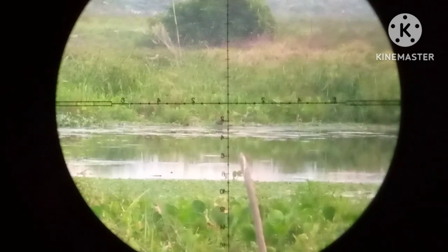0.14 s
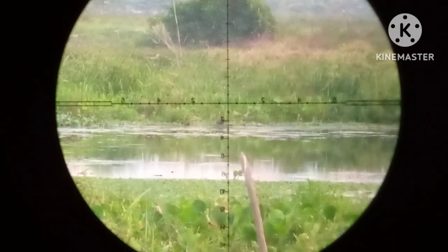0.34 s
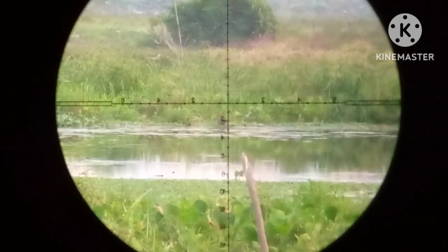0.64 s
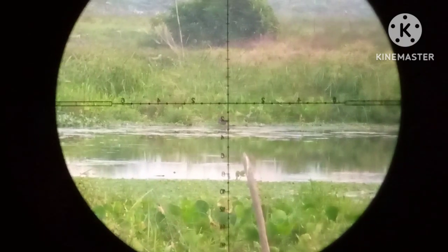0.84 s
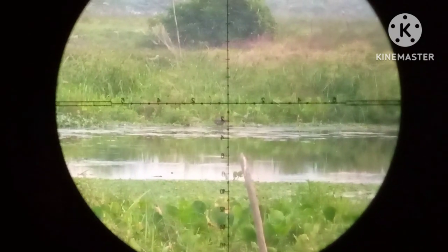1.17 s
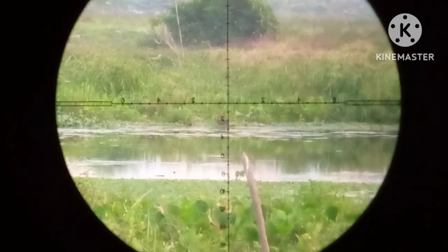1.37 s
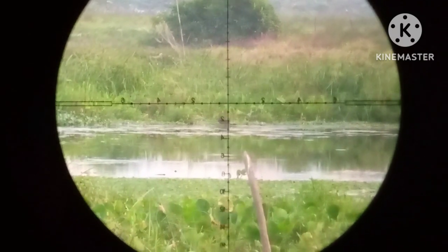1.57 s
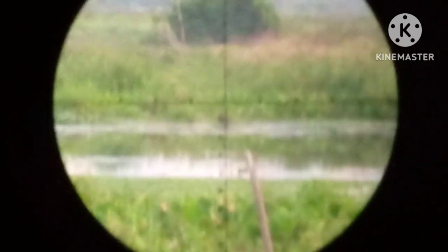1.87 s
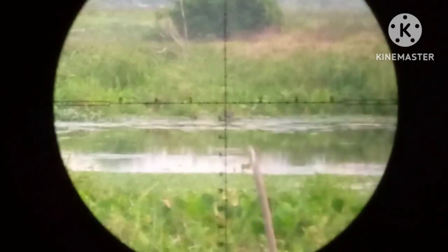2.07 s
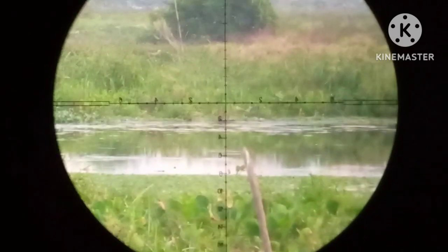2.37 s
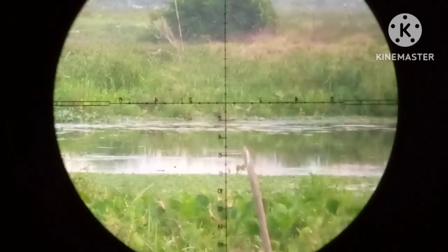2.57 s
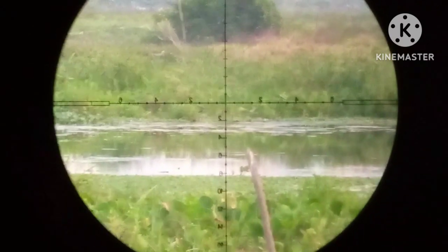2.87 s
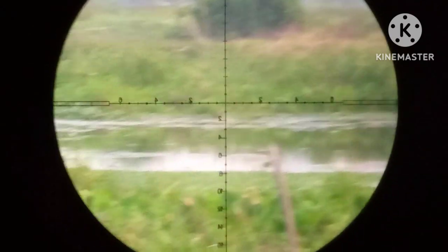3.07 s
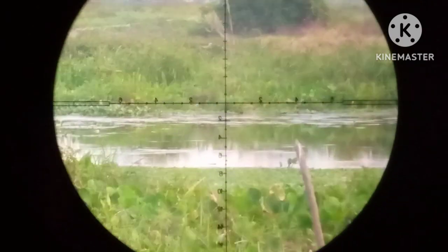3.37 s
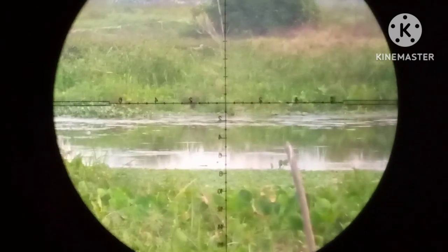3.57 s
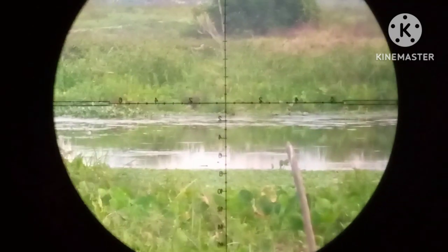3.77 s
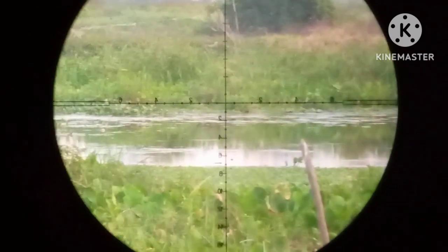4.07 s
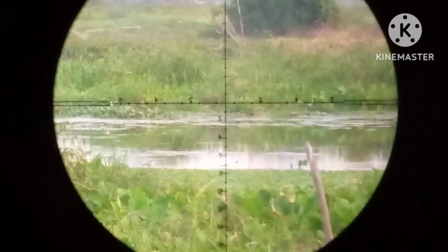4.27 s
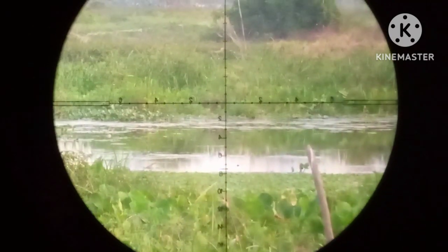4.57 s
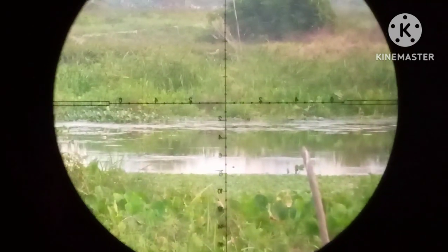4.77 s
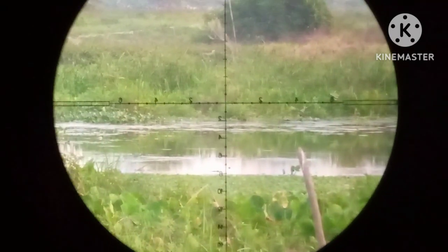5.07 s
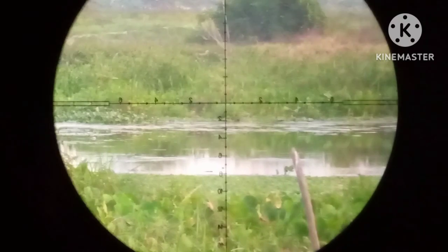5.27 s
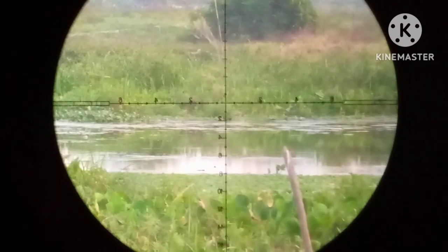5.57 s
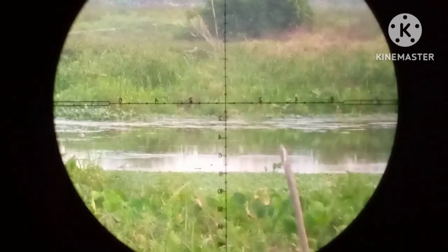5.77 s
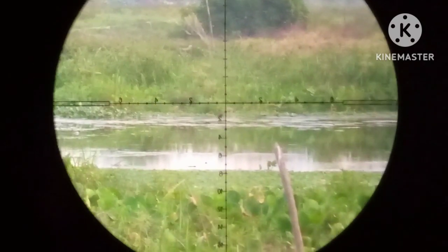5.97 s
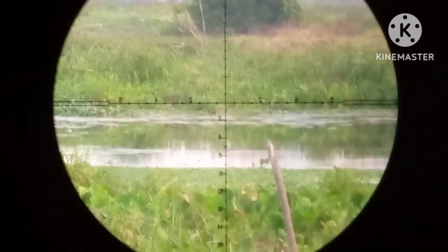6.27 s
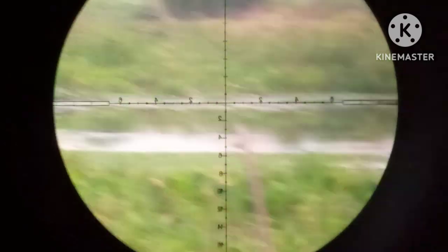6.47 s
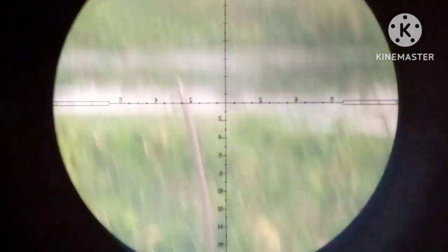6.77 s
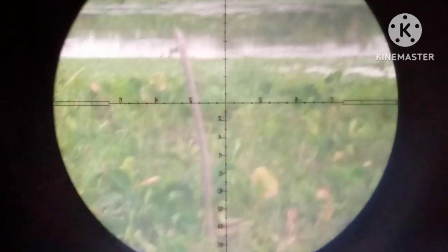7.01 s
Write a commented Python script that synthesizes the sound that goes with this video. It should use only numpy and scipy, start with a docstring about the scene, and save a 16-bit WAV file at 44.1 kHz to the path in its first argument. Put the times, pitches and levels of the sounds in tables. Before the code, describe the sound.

Throughout the seven seconds, a narrow, shrill insect drone around 7.5 kHz hovers over soft open air and faint low breeze, with delicate crickets and far, drooping bird whistles and rasps. A near bird gives very short, rising double chips at about 0.9, 1.2 and 1.6 seconds. At 1.86 an air rifle fires close by: a dense cluster of metal clashes and thuds within 50 milliseconds, a sharp rush of air, a rough brief squawk and a ringing steel tail fading over half a second. A resonant knock comes at 2.08, a bright distant slap with a short echo at 2.5, and a tiny click at 2.8. The calm marsh returns, with faint arched bird notes from 3.1, a lone lower chip at 3.67 and two little round plops at 3.8 and 3.9. From 6.48, dry handling clicks cluster, a loose part bounces quickly near 6.7, and sparse ticks continue to the end.

```python
"""Throughout, filtered-noise insects drone high in pitch over open air; gliding tones form two crickets and far birds.
First a near bird gives three double chips, each a rapid upward pitch sweep. Then an air rifle fires across a marsh:
noise bursts form its slamming action and rush of air, a shaken tone its squawk, decaying modes its ringing steel.
A resonant knock in the gun follows, then a far slap of noise and short modes, and a first small click.
Later come a lone chip and two plops as decaying tones; last, the rifle clicks and a loose part bounces as it is moved."""
import sys
import numpy as np
from scipy import signal
from scipy.fft import rfft, irfft, next_fast_len
from scipy.io import wavfile

SR = 44100
rng = np.random.default_rng(int(sys.argv[2]) if len(sys.argv) > 2 else 0)


def store_pcm(level_fs):
    """Save levels as 16-bit WAV."""
    pcm = np.round(np.clip(level_fs, -1, 1) * 32767).astype(np.int16)
    wavfile.write(sys.argv[1], SR, np.atleast_2d(pcm).T)


N = 314874
T = np.arange(N) / SR
LN_1000 = np.log(1000)  # amplitude decay over one t60, 60 dB

# All noise colours are scaled to unit rms before use, so their levels are relative.
# Insect chorus: [f/Hz, relative level/dB per Hz]
DRONE_COLOUR = [(6000, -32.5), (6250, -20), (6450, -10), (7000, -2.5), (7350, 0), (7600, 3.5), (7850, -2.5),
                (8050, -14), (8500, -25.5), (9000, -19.5), (9500, -26.5), (10800, -29), (11500, -35)]
# Open air: [f/Hz, relative level/dB per Hz]
AIR_FLOOR_COLOUR = [(76, -30.5), (130, 1.5), (415, -5.5), (608, -7.5), (1070, -18.5), (2030, -23.5),
                    (2550, -25.5), (3070, -25.5), (3520, -27.5), (4360, -24.5), (5000, -36.5),
                    (6500, -51.5), (11000, -120)]
# Faint high hiss: [f/Hz, relative level/dB per Hz]
HISS_COLOUR = [(2000, -20), (4000, 6), (10000, 0.5), (11500, -11), (13800, -7.5), (15000, 5), (15600, 0.5),
               (16200, -17.5)]
# Low rumble of breeze, thumps and recoil: [f/Hz, relative level/dB per Hz]
RUMBLE_COLOUR = [(20, -28), (40, -11.5), (65, 0.5), (95, 1), (130, -6.5), (200, -18.5), (400, -40.5)]
# Brief soft low thumps in the rumble: [t/s, level/dB]
RUMBLE_SWELLS = [(.34, -66), (1.1, -66.5), (1.399, -63.5), (3.22, -60.5), (3.6, -65), (4.36, -64.5),
                 (5.11, -64.5), (5.89, -65.5)]
# Scraped wing of a loosely pulsing insect: [f/Hz, relative level/dB per Hz]
CHURR_COLOUR = [(7500, -20), (7800, 0.5), (8200, -2.5), (8500, -17)]
# Far drooping whistles: [t/s, starting f/Hz, level/dB before the common gain]
WHISTLES = [(.01, 4630, -79.5), (.16, 4380, -82), (0.529, 4590, -72.5), (2.13, 4600, -77.5),
            (2.66, 4520, -81), (4.34, 4440, -72.5), (4.87, 4610, -80.5), (5.55, 4470, -78),
            (6.33, 4120, -80), (6.76, 4566, -74.5)]
# Rasp runs of two birds: [first t/s, number of calls, gap/s, gap change per call/s,
# length/s, f/Hz, level/dB before the common gain]
RASP_RUNS = [(.703, 4, .124, 0.0112, 0.044, 3990, -69.5), (4.047, 6, .33, -0.0079, 0.074, 3110, -73.5)]
# Small bird's arched notes: [t/s, length/s, top f/Hz, level/dB before the common gain]
ARCHES = [(3.134, .14, 5920, -73.5), (3.354, .125, 5880, -74.5), (3.655, .085, 5370, -70)]
# Short, nearly level notes of far birds: [t/s, length/s, middle f/Hz, level/dB before the common gain]
LEVEL_NOTES = [(0.314, 0.016, 5010, -68), (.683, .18, 2820, -89), (2.898, 0.13, 3350, -80.5),
               (3.071, 0.18, 3330, -80), (3.234, .028, 4720, -73), (3.386, 0.052, 1954, -78.5),
               (3.776, 0.034, 4480, -75.5), (4.22, .11, 608, -66.5), (4.555, 0.048, 4810, -73),
               (5.479, .14, 1509, -82), (5.895, .055, 2060, -71.5), (5.917, 0.027, 2980, -68),
               (5.94, .03, 5210, -69.5)]
# Near bird's double chips: [t/s, first chip's top f/Hz, first level/dB, second level/dB]
DOUBLE_CHIPS = [(0.9118, 8020, -36, -27.5), (1.2062, 7785, -29.5, -26.5), (1.6262, 7860, -34, -28)]
# One lower, lone chip: [t/s, length/s, f approached/Hz, level/dB, start drop/share of f, sweep time/share of length]
LONE_CHIP = (3.6653, .0033, 5150, -44, .64, .5)
# Small plops on the water: [t/s, relative level/dB, f/Hz]
PLOPS = [(3.798, -57, 1870), (3.895, -56.5, 1340)]
# Clicks of handling: [t/s, relative level/dB, ring f/Hz, ring t60/s]
CLICKS = [(2.8114, -56.5, 5790, .015), (6.479, -46, 2554, .016), (6.5139, -42, 1360, .017),
          (6.548, -51.5, 2410, .02), (6.629, -66, 3550, .03), (6.641, -57, 6070, .015),
          (6.6492, -46, 3240, 0.023), (6.655, -52, 4570, 0.014), (6.8676, -57, 4330, .012),
          (6.9384, -51.5, 6120, 0.019), (7.0738, -61, 2490, 0.023)]
# Broad tick of a click: [f/Hz, relative level/dB per Hz]
CLICK_COLOUR = [(600, -25), (1400, 6), (1900, -2), (2500, -9.5), (3400, -1), (4600, -13), (5300, -11),
                (6200, 6.5), (7000, -21), (8000, -48), (14000, -24)]
# Resonances that every click wakes: [f/Hz]
HOUSING_MODES = [1430, 2460, 3430, 4640, 6140]
# The pellet's far slap: [t/s, relative level/dB, t60/s]
SLAP_BLOWS = [(2.4975, -41, 0.029), (2.5003, -27, 0.021), (2.5045, -40, 0.011), (2.508, -49, 0.085)]
# Broad sound of the slap: [f/Hz, relative level/dB per Hz]
SLAP_COLOUR = [(300, -48), (900, -44), (1300, -0.5), (2000, -6), (2600, 3), (3300, 1), (4200, 2),
               (5200, -6), (6200, 0.5), (6900, -27), (7500, -10), (8400, -27), (12000, -33), (15000, -28)]
# Ringing of what the pellet strikes: [f/Hz, level/dB, t60/s]
TARGET_MODES = [(1630, -54, 0.092), (1920, -48.5, 0.097), (2470, -39.5, 0.043), (2550, -57, 0.25),
                (3670, -47, 0.071), (4030, -39, 0.058), (4480, -43.5, 0.086), (6200, -62, 0.17),
                (7450, -42, 0.057)]
# Rattle and knock in the gun: [t/s, level/dB, t60/s]; a zero t60 is silent
KNOCK_BLOWS = [(2.066, -52.5, 0.02), (2.0765, -56, 0), (2.0798, -45, 0.16)]
# Body resonances of the gun: [f/Hz, bandwidth/Hz, relative level/dB]
STOCK_MODES = [(858, 48, -1.5), (977, 60, 2.5), (1170, 53, -2.5), (1640, 120, -11), (3190, 110, 5.5),
               (3700, 144, 8.5), (4230, 140, 1), (5470, 170, 4), (7100, 70, -10)]
# Metal contacts in the action: [t/s, bright clash level/dB, low thud level/dB before the bass cut]
ACTION_CONTACTS = [(1.8591, -26, -41), (1.865, -15.5, -26.5), (1.869, -26, -38), (1.8774, -25, -23.5),
                   (1.8872, -27, -25), (1.894, -28, -22), (1.8955, -21, -30), (1.9, -15, -24),
                   (1.907, -26.5, -40)]
# Bright part of a contact: [f/Hz, relative level/dB per Hz]
CLASH_COLOUR = [(900, -24.5), (1500, -9.5), (1920, -2), (2390, -12.5), (3000, -1.5), (3880, -5.5),
                (4200, -5), (4870, 1.5), (5940, -9), (7030, 0.5), (8490, -12), (10500, -18.5), (12600, -28),
                (15000, -12), (16000, -15)]
# Low part of a contact: [f/Hz, relative level/dB per Hz]
THUD_COLOUR = [(80, -6.5), (170, -8), (240, 6), (340, -8), (550, -2), (720, -6.5), (1050, -4), (1450, 0),
               (1900, -7), (3000, -28.5), (8000, -48.5)]
# Rush of air: [f/Hz, relative level/dB per Hz]
BLAST_COLOUR = [(24, -46.5), (60, -16.5), (231, -7.5), (467, -19), (556, -6), (852, -9), (1370, -10),
                (2380, -9.5), (2700, -8), (3930, -11.5), (4680, -6), (5180, -12.5), (7000, -8.5),
                (10700, -27), (16000, -21.5)]
# Fluttering valve: [t/s, f/Hz, level/dB]
SQUAWK = [(1.897, 1248, -90), (1.903, 1307, -30), (1.912, 1448, -33), (1.92, 1370, -29.5),
          (1.924, 1235, -34.5), (1.928, 1280, -26), (1.931, 1550, -34.5), (1.938, 1600, -85.5)]
# Ringing steel of the rifle: [f/Hz, level/dB, t60/s]
STEEL_MODES = [(479.2, -49, 1.0), (749, -44, 0.37), (1266, -44, .18), (1320, -35, .13), (1496, -36, .17),
               (1678, -40, 0.17), (1961, -39, 0.16), (2790, -47, .33), (3497, -40, .14), (3870, -55, .7),
               (4600, -49, .36), (4773, -36, .16), (5125, -48, .35), (6030, -52, .35), (6825, -37, 0.19),
               (7215, -48, .33)]
# Ring and scatter after the shot: [f/Hz, relative level/dB per Hz]
TAIL_COLOUR = [(200, -22.5), (400, -7.5), (620, -15.5), (780, -10), (1100, -18.5), (1550, -7), (1900, -12),
               (3800, -6), (5000, -5), (7300, 0), (8600, -17), (11000, -17.5), (13000, -24), (15300, -12)]

DRONE_DB, AIR_FLOOR_DB, HISS_DB = -73.5, -75.5, -90.0
# Breeze on the microphone: mean level, rate and spread of its variation
BREEZE_DB, GUSTS_PER_S, GUST_DB = -72, 13, 1.56
SWELL_WIDTH_S = 0.039
FAST_CRICKET_PER_S, SLOW_CRICKET_PER_S = 116, 16.8
# Roughness scales the common pitch shake
WHISTLE_S, WHISTLE_DROOP_HZ, WHISTLE_ROUGH = 0.098, 335, 0.14
RASP_ROUGH = 0.52
ARCH_BEND, ARCH_TOP_AT, ARCH_ROUGH = 0.87, 0.3, 0.35  # pitch curvature; top as share of the note
NOTE_SAG, NOTE_ROUGH = 0.018, 0.096  # share of the pitch lost over a note
FLICKER_PER_S, FLICKER_DB = 45, 2.0  # far calls waver in level
CHIP_GAP_S, FIRST_CHIP_S, SECOND_CHIP_S, SECOND_CHIP_DROP_HZ = 0.0186, 0.0044, 0.0057, 490
# A loose part: start, first relative level and pitch; first gap, gap ratio and loss per touch
BOUNCE_S, BOUNCE_DB, BOUNCE_HZ = 6.6776, -55.5, 1440
BOUNCE_GAP_S, BOUNCE_SHRINK, BOUNCE_LOSS_DB = 0.0172, 0.83, 3
CLASH_T60_S, THUD_T60_S = 0.024, 0.018
# Air leaves the barrel: it swells while the valve is open, then dies away as it shuts
BLAST_S, BLAST_HOLD_S, BLAST_ATTACK_S, BLAST_T60_S, BLAST_DB = 1.859, 0.053, 0.0029, 0.098, -31.5
# The kick shakes the microphone
RECOIL_S, RECOIL_RISE_S, RECOIL_T60_S, RECOIL_DB = 1.866, 0.012, 0.16, -44
CUTOFF_HZ = 15900


def from_db(db):
    """Logarithmic level: convert decibels to amplitude gain."""
    return 10 ** (np.asarray(db) / 20)


def rms_one(x):
    """Normalization: scale a signal to unit rms."""
    return x / np.sqrt(np.mean(x ** 2) + 1e-20)


def in_time(rows):
    """Linear interpolation: turn each column of a timed curve into samples."""
    times, *columns = np.transpose(rows)
    return [np.interp(T, times, column) for column in columns]


def noise(spectrum, size=2 ** 15):
    """Spectral shaping: colour white noise and repeat it to fill the scene; a short stretch serves for blows."""
    hz, db = np.transpose(spectrum)
    size = next_fast_len(size)
    log_f = np.log(np.maximum(np.fft.rfftfreq(size, 1 / SR), 1))
    outside = np.abs(log_f - np.clip(log_f, np.log(hz[0]), np.log(hz[-1])))
    # Beyond the ends, fall 60 dB per factor e in frequency
    gain = from_db(np.interp(log_f, np.log(hz), db) - 60 * outside)
    coloured = irfft(rfft(rng.standard_normal(size)) * gain, size)
    return np.resize(rms_one(coloured), N)


def drift(rate):
    """Slow random modulation: join chance values, rate per second, into a curve of unit rms."""
    knots = rng.standard_normal(N // 8)
    return rms_one(np.interp(T * rate, np.arange(len(knots)), knots))


def decay(start, t60, rise=0.0004):
    """Damped excitation: a quick rise and an exponential fall, ended after two t60."""
    out = np.zeros(N)
    at = slice(*np.searchsorted(T, [start, start + 2 * t60]))
    age = T[at] - start
    out[at] = (1 - np.exp(-age / rise)) * np.exp(-LN_1000 * age / t60)
    return out


def blows(rows):
    """Incoherent superposition: add the powers of several (t/s, level/dB, t60/s) envelopes."""
    return np.sqrt(sum((from_db(db) * decay(s, t60)) ** 2 for s, db, t60 in rows))


def mode(start, hz, t60):
    """Damped normal mode: a struck sine decays exponentially."""
    out = decay(start, t60)
    at = np.flatnonzero(out)
    out[at] *= np.sin(2 * np.pi * hz * (T[at] - start))
    return out


def delayed(x, seconds):
    """Propagation delay: the same sound arrives later."""
    return np.interp(T - seconds, T, x, left=0)


def reeds(x, t60):
    """Diffuse scattering from vegetation: convolve with decaying noise of unit energy."""
    age = T[:SR // 2]
    response = rng.standard_normal(len(age)) * np.exp(-LN_1000 * age / t60)
    return signal.fftconvolve(x, response / np.linalg.norm(response))[:N]


def high_pass(x, order, hz):
    """Butterworth filtering: attenuate sound below the corner frequency."""
    return signal.sosfilt(signal.butter(order, hz, "high", fs=SR, output="sos"), x)


def marsh():
    """Broadband ambience: coloured noises drift in level and brief low thumps add power to the low rumble."""
    drone_level = from_db(DRONE_DB + 0.6 * drift(25) + 0.17 * drift(2))
    drone = drone_level * noise(DRONE_COLOUR, size=N)
    air = from_db(AIR_FLOOR_DB + 0.24 * drift(5.3)) * noise(AIR_FLOOR_COLOUR, size=N)
    hiss = from_db(HISS_DB + 0.79 * drift(3.7)) * noise(HISS_COLOUR, size=N)
    breeze = from_db(BREEZE_DB + GUST_DB * drift(GUSTS_PER_S))
    swells = sum(from_db(db) * np.exp(-((T - s) / SWELL_WIDTH_S) ** 2) for s, db in RUMBLE_SWELLS)
    rumble = np.hypot(breeze, swells) * noise(RUMBLE_COLOUR, size=N)
    return drone + air + rumble + hiss


def churr(per_s=11.0, unevenness=0.12, level_db=-80.5):
    """Amplitude modulation: a scraped wing resonance swells and fades with each stroke."""
    strokes = np.cumsum(per_s * (1 + unevenness * drift(8))) / SR
    return from_db(level_db) * np.sin(np.pi * strokes) ** 2 * noise(CHURR_COLOUR, size=N)


def cricket(per_s, top_hz, fall_hz, duty, level_db):
    """Stridulation: each wing stroke is a short tone that sinks as the wing slows."""
    stroke = np.cumsum(per_s * (1 + 0.041 * drift(7.1))) / SR % 1
    u = np.minimum(stroke / duty, 1)  # the rest of the cycle is silent
    pitch = top_hz - fall_hz * u + 55 * drift(120)
    tone = np.sin(np.pi * u) * np.sin(2 * np.pi * np.cumsum(pitch) / SR)
    return from_db(level_db + 2.7 * drift(22)) * (tone + from_db(-8.5) * reeds(tone, t60=0.1))


def far_twitter(level_db=-89, count=70):
    """Random superposition: short, shaky slurs of faint birds at chance times and pitches."""
    out, shake = np.zeros(N), drift(500)
    for when, high, long, slope in rng.random((count, 4)):
        u = np.linspace(0, 1, int(SR * (0.025 + 0.045 * long)))
        at = int(when * (N - len(u))) + np.arange(len(u))
        slur = 1 + 0.35 * (slope - 0.6) * u
        pitch = (2600 + 2400 * high) * slur + 60 * shake[at]
        out[at] += np.sin(np.pi * u) * np.sin(2 * np.pi * np.cumsum(pitch) / SR)
    return from_db(level_db) * (out + from_db(-3) * reeds(out, t60=0.3))


def call(s, length, db, contour, shake):
    """Frequency modulation: a swelling note follows contour(u), u from 0 to 1, plus a shake in Hz."""
    out = np.zeros(N)
    at = slice(*np.searchsorted(T, [s, s + length]))
    u = (T[at] - s) / length
    phase = 2 * np.pi * np.cumsum(contour(u) + shake[at]) / SR
    out[at] = from_db(db) * np.sin(np.pi * u) * np.sin(phase)
    return out


def far_birds(rasp_hz=260):
    """Pitch contour and roughness: whistles droop, notes arch or sag, and rasps shake quickly."""
    shake = rasp_hz * drift(900)
    out = np.zeros(N)
    for s, hz, db in WHISTLES:
        out += call(s, WHISTLE_S, db, lambda u: hz - WHISTLE_DROOP_HZ * u ** 1.5, WHISTLE_ROUGH * shake)
    for s, length, hz, db in ARCHES:
        out += call(s, length, db, lambda u: hz * (1 - ARCH_BEND * (u - ARCH_TOP_AT) ** 2), ARCH_ROUGH * shake)
    for s, length, hz, db in LEVEL_NOTES:
        out += call(s, length, db, lambda u: hz * (1 - NOTE_SAG * (u - 0.5)), NOTE_ROUGH * shake)
    for first, calls, gap, change, length, hz, db in RASP_RUNS:
        for k in range(round(calls)):
            start = first + k * gap + change * k * (k - 1) / 2
            out += call(start, length, db, lambda u: hz, RASP_ROUGH * shake)
    out = out * from_db(FLICKER_DB * drift(FLICKER_PER_S))
    return from_db(-1.5) * out + from_db(-3.5) * reeds(out, t60=0.17)


def plops():
    """Bubble resonance: a small bubble swells into a brief, round note."""
    out = np.zeros(N)
    for s, db, hz in PLOPS:
        out += from_db(db + 8.0) * decay(s, t60=0.023, rise=0.005) * np.sin(2 * np.pi * hz * T)
    return from_db(5) * out + from_db(-7.0) * reeds(out, t60=0.17)


def chip(s, length, top_hz, db, start_share=0.45, sweep=0.14):
    """Exponential frequency sweep: pitch whips up toward its top within a few milliseconds."""
    out = np.zeros(N)
    at = slice(*np.searchsorted(T, [s, s + length]))
    u = (T[at] - s) / length
    pitch = top_hz * (1 - start_share * np.exp(-u / sweep))
    out[at] = from_db(db) * np.sin(np.pi * u) ** 2 * np.sin(2 * np.pi * np.cumsum(pitch) / SR)
    return out


def near_bird():
    """Reflection: paired chips, the second longer and lower, are repeated by the ground and scattered."""
    out = np.zeros(N)
    for s, hz, first_db, second_db in DOUBLE_CHIPS:
        out += chip(s, FIRST_CHIP_S, hz, first_db)
        out += chip(s + CHIP_GAP_S, SECOND_CHIP_S, hz - SECOND_CHIP_DROP_HZ, second_db)
    ground = from_db(-13.0) * delayed(out, 0.0108) + from_db(-16.0) * delayed(out, 0.013)
    return out + ground + from_db(-12.5) * reeds(out, t60=0.16)


def bounces(t60=0.025, count=4):
    """Inelastic impact: each touch of a loose part is weaker and the gaps shrink."""
    k = np.arange(count)
    gaps = BOUNCE_GAP_S * BOUNCE_SHRINK ** k
    starts = BOUNCE_S + np.cumsum(gaps) - gaps
    levels = BOUNCE_DB - BOUNCE_LOSS_DB * k
    return [(s, db, BOUNCE_HZ, t60) for s, db in zip(starts, levels)]


def handling():
    """Impulse excitation: each click is a broad tick, a main ring and weaker housing modes."""
    clicks = CLICKS + bounces()
    tick = blows([(s, db - 9, 1.06 * t60) for s, db, hz, t60 in clicks]) * noise(CLICK_COLOUR)
    ring = np.zeros(N)
    age = T[:SR // 20]
    chances = rng.standard_normal((len(clicks), len(HOUSING_MODES)))
    for (s, db, hz, t60), chance in zip(clicks, chances):
        others = sum(from_db(1.9 * c - 15) * np.sin(2 * np.pi * f * age) for f, c in zip(HOUSING_MODES, chance))
        at = int(s * SR)
        envelope = from_db(db - 3.5) * decay(0, t60)[:len(age)]
        ring[at:at + len(age)] += envelope * (np.sin(2 * np.pi * hz * age) + others)
    thin = high_pass(tick + ring, 3, 1150)
    return thin + from_db(-11.5) * reeds(thin, t60=0.08)


def slap():
    """Impact and return across water: a bass-thin strike, brief modes and a duller trailing echo."""
    hit = from_db(-1.0) * blows(SLAP_BLOWS) * noise(SLAP_COLOUR)
    ring = sum(from_db(db) * mode(SLAP_BLOWS[1][0], hz, t60) for hz, db, t60 in TARGET_MODES)
    trail = from_db(-55.5 + 2.5 * drift(120)) * decay(2.515, t60=0.29, rise=0.0031)
    echo = trail * noise([(800, -19), (1200, -4.5), (2300, -3.0), (3300, -7.5), (4400, -10),
                          (6200, -15), (7500, -22)])
    return high_pass(hit + ring + echo, 4, 950)


def knock():
    """Modal excitation: a part of the action rattles, drops back and rings the stock; one note hangs on."""
    body = np.zeros(N)
    for hz, width, db in STOCK_MODES:
        t60 = LN_1000 / (np.pi * width)  # wider resonances die sooner
        body += from_db(db - 42.0) * mode(KNOCK_BLOWS[-1][0], hz, t60)
    note_colour = noise([(1190, -30), (1310, 16), (1350, -1), (1450, -36)])
    note = from_db(-60.0) * decay(2.098, t60=0.18, rise=0.0029) * note_colour
    rattle_colour = noise([(300, 4), (650, -6), (800, -7), (1100, 5), (2200, -7.5), (3400, -2.5),
                           (4800, -3.5), (7000, 1.5), (8500, -22.5), (15000, -29)])
    rattle = blows(KNOCK_BLOWS) * rattle_colour
    return body + from_db(-22) * reeds(body, t60=0.068) + rattle + note


def coils(start, t60, count=170):
    """Modal density: many weak, uneven modes of spring and barrel ring; the high ones die first."""
    age, out = T[:SR * 3 // 4], np.zeros(N)
    hz, db = np.transpose(TAIL_COLOUR)
    ring = 0
    for place, turn, size in rng.random((count, 3)):
        f = 1200 * 13 ** place  # chance pitches, evenly likely on a log scale
        gain = from_db(np.interp(f, hz, db) + 8 * size) * np.sqrt(f)
        damping = np.exp(-LN_1000 * age / t60 * (f / 5000) ** 0.23)
        ring = ring + gain * damping * np.sin(2 * np.pi * (f * age + turn))
    out[:len(age)] = ring / np.std(ring[:SR // 100]) * (1 - np.exp(-age / 0.0085))
    return delayed(out, start)


def action():
    """Impact noise: every metal contact gives a bright clash and a low thud."""
    clash = blows([(s, db, CLASH_T60_S) for s, db, low in ACTION_CONTACTS]) * noise(CLASH_COLOUR)
    thud = blows([(s, low, THUD_T60_S) for s, db, low in ACTION_CONTACTS]) * noise(THUD_COLOUR)
    return clash, high_pass(thud, 2, 130)


def blast():
    """Jet noise: the rush swells while the valve is open, then decays as it shuts."""
    age = np.maximum(T - BLAST_S, 0)
    swell = 1 - np.exp(-age / BLAST_ATTACK_S)
    fall = np.exp(-LN_1000 * np.clip(age - BLAST_HOLD_S, 0, 1) / BLAST_T60_S)
    return from_db(BLAST_DB) * swell * fall * noise(BLAST_COLOUR)


def valve_squawk():
    """Self-sustained flutter: a shutting valve sounds two harmonics with shaken pitch and level."""
    pitch, level_db = in_time(SQUAWK)
    phase = 2 * np.pi * np.cumsum(pitch * (1 + 0.085 * drift(900))) / SR
    flutter = (1 + 0.39 * drift(700)) * (np.sin(phase) + from_db(-8.5) * np.sin(2 * phase))
    sounding = (T < SQUAWK[-1][0]) * (T > SQUAWK[0][0])
    return from_db(level_db) * rms_one(flutter) * sounding


def shot():
    """Superposition: contacts, air, recoil and squawk sound while steel, marsh and bank prolong them."""
    clash, thud = action()
    recoil = from_db(RECOIL_DB) * decay(RECOIL_S, RECOIL_T60_S, RECOIL_RISE_S) * noise(RUMBLE_COLOUR)
    steel = sum(from_db(db) * mode(ACTION_CONTACTS[1][0], hz, t60) for hz, db, t60 in STEEL_MODES)
    steel = steel + from_db(-36) * coils(1.882, t60=0.39)
    scatter_level = from_db(-44 + 2.2 * drift(99)) * decay(1.875, t60=0.38, rise=0.012)
    scatter = scatter_level * noise(TAIL_COLOUR)
    bank = from_db(-21) * delayed(clash, 0.036)  # echo off the near bank
    return clash + thud + blast() + recoil + valve_squawk() + steel + scatter + bank


def scene():
    """Linear superposition: all sources add at one microphone."""
    slow_cricket = cricket(per_s=SLOW_CRICKET_PER_S, top_hz=5903, fall_hz=680, duty=0.43, level_db=-83.5)
    fast_cricket = cricket(per_s=FAST_CRICKET_PER_S, top_hz=10990, fall_hz=1700.6, duty=0.75, level_db=-89.0)
    insects = slow_cricket + fast_cricket + churr()
    birds = far_twitter() + far_birds() + chip(*LONE_CHIP) + near_bird()
    rifle = handling() + slap() + knock() + shot()
    return (marsh() + insects + birds + plops() + rifle)[None, :]


def record(dry):
    """Band limitation: the microphone loses the deepest bass and the top is cut steeply."""
    thin = high_pass(dry, 2, 32)
    return signal.sosfilt(signal.ellip(10, 0.2, 80, CUTOFF_HZ, fs=SR, output="sos"), thin)


dry = scene()
out = record(dry)
store_pcm(out)
```